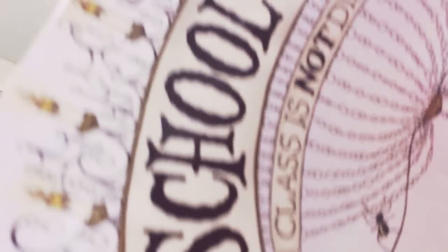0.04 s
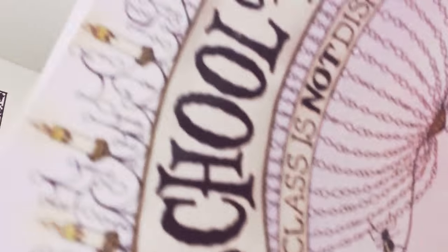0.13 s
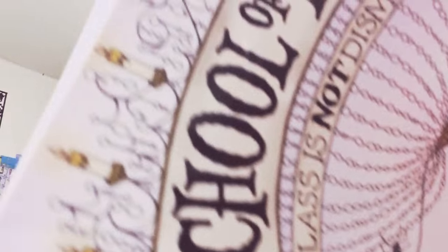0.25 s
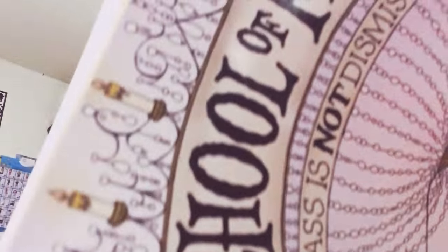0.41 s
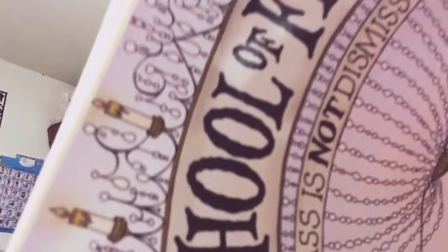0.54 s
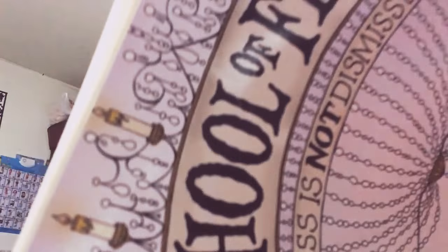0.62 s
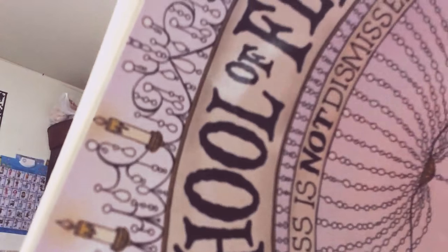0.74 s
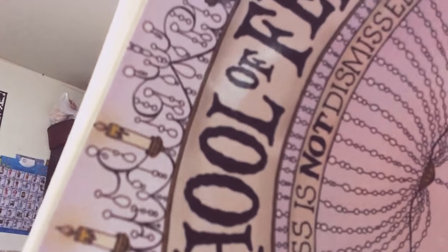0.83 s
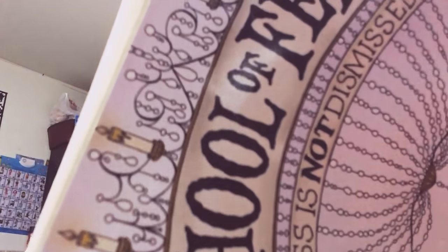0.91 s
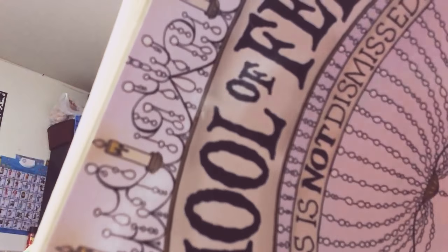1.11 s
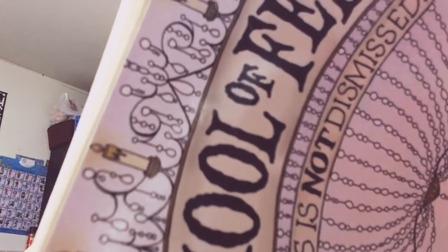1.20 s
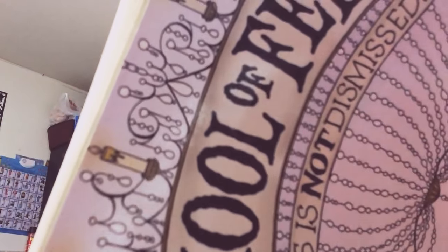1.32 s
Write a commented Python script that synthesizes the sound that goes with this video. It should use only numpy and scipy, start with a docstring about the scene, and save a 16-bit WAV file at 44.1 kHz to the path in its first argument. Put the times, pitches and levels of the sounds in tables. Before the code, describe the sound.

A book is handled close to the microphone in a small quiet room. At about 0.2 seconds comes the loudest moment, a quick cluster of sharp paper snaps, scraping and dull cover bumps, easing by 0.5. After a lull with very faint finger squeaks, another snap at 0.7 starts lighter rustling strokes, ticks and soft knocks until about 1.1. A faint bump follows near 1.3 over a low hush.

```python
"""A small quiet room, in which a book is shifted in the hands close by.
Bumps excite the damped modes of the cover, each over a dull thud, and its edges catch and snap free.
Paper and fingers slide over it in short strokes, grainy with the many tiny slips of friction.
Faint thin squeaks fill the pauses, above a low hush. The walls add a short dull reverberation."""
import sys
import numpy as np
from scipy import signal
from scipy.fft import rfft, irfft, next_fast_len
from scipy.io import wavfile
from scipy.ndimage import map_coordinates

SR = 44100
rng = np.random.default_rng(int(sys.argv[2]) if len(sys.argv) > 2 else 0)


def put_to_file(sound):
    """Save the sound as 16-bit audio at rate SR, in the file named by the first command-line argument."""
    columns = np.atleast_2d(sound).T  # one column per channel
    safe = np.clip(columns, -1, 1)
    whole_steps = np.round(safe * 32767)
    wavfile.write(sys.argv[1], SR, whole_steps.astype(np.int16))


N = 59535

# spectrum of the room's hush (frequency [Hz], relative density [dB])
HUSH_SPECTRUM = [(25, -9), (60, 1), (260, 0), (700, -5.5), (1200, -12), (3400, -14), (6000, -17.5),
                 (15500, -30)]
# reverberation time of the room (frequency [Hz], t60 [s])
REVERB_T60 = [(100, 0.31), (450, 0.37), (650, 0.34), (900, 0.2), (4000, 0.24), (12000, 0.27)]
# initial spectrum of the reverberation (frequency [Hz], relative level [dB])
REVERB_SPECTRUM = [(80, -1.5), (300, -1.5), (480, 1), (650, 1.5), (1000, -0.5), (4000, -2.5), (12000, 0.5)]
# fingertip squeaks (start [s], length [s], level [dB], centre [Hz], spread [octaves])
FINGER_SQUEAKS = [(0.013, 0.053, -83, 3440, 0.015), (0.088, 0.088, -79, 3460, 0.017),
                  (0.497, 0.086, -73.5, 5070, 0.17), (0.566, 0.083, -78, 5660, .03),
                  (0.644, 0.068, -67.5, 5120, .085)]
# sliding strokes (start [s], attack [s], hold [s], release t60 [s], level [dB], tilt [dB/octave])
SLIDING_STROKES = [(0.211, 0.017, 0.031, 0.83, -52.5, -1.5), (0.24, 0.016, 0.058, 0.1367, -37, -1),
                   (0.333, 0.0071, 0.0036, 0.3532, -42.5, 0), (0.379, 0.0033, 0.0036, 0.29, -55.5, -2.5),
                   (0.43, 0.0084, 0.03, 0.08, -50, -3), (0.708, 0.0054, .012, 1.2, -54.5, -3.5),
                   (0.724, 0.013, 0.0074, 0.02, -47, 0), (0.766, 0.0089, 0.015, .1, -69, -5.5),
                   (0.808, 0.0063, 0.012, 0.06, -52, 2.5), (0.841, 0.0087, 0.01, 0.22, -53, -1.5),
                   (0.904, 0.01, 0.028, 0.01, -54.5, 1), (.938, 0.0032, 0.031, 0.18, -50, 0),
                   (.974, 0.014, 0.0075, 0.24, -45, 1), (1.011, 0.011, .004, 0.47, -60.5, -4),
                   (1.06, 0.0092, 0.0027, 0.2756, -53.5, 0)]
# spectrum of sliding friction (frequency [Hz], relative density [dB])
FRICTION_SPECTRUM = [(60, -8), (200, -1), (480, -4), (720, 2), (1100, -3.5), (2000, 0), (3100, -4.5),
                     (4300, -2.5), (6500, -8), (8500, -13), (11000, -22.5), (15500, -40.5)]
# narrow treble resonances of the cover (frequency [Hz], width [Hz], boost [dB])
COVER_RESONANCES = [(2265, 90, -0.5), (2730, 110, 6.5), (2930, 120, 4), (3200, 80, 9.5), (3335, 60, 5.5),
                    (3590, 35, 0.5), (3820, 20, 1)]
# snaps of paper and cover edges (time [s], level [dB], centre [Hz], spread [octaves], t60 [s])
EDGE_SNAPS = [(0.1647, -57.5, 1440, 1.46, 0.078), (0.2117, -42, 6740, 0.22, 0.011),
              (0.2118, -46.5, 2420, 1.6, 0.018), (0.2423, -36.5, 5530, 0.62, 0.041),
              (0.2424, -28.5, 1730, 0.82, 0.014), (.2679, -20, 3260, 0.69, 0.031),
              (0.2709, -25.5, 2980, 0.62, .03), (.3052, -39, 12500, .4, .009),
              (0.3115, -25.5, 2910, 0.79, 0.026), (.342, -39, 3930, 0.95, 0.044),
              (.394, -42, 4940, 0.24, 0.042), (0.4365, -38.5, 3060, 1.55, 0.019),
              (.463, -41, 2700, 0.62, 0.019), (0.7135, -39.5, 5000, 0.45, 0.013),
              (0.7133, -46.5, 2000, 1.5, 0.024), (.7386, -27.5, 4200, 1.32, .011),
              (0.8118, -47.5, 4850, 0.27, .04), (.865, -48, 7050, 0.65, 0.018), (0.9083, -37, 3000, 1, .02),
              (0.938, -39.5, 2980, 1.16, 0.013), (.957, -48, 7340, 0.27, 0.086),
              (.982, -44.5, 1880, 0.82, 0.076), (0.999, -44, 7340, 0.17, .035),
              (1.084, -44.5, 4500, 1.3, 0.027), (1.2962, -53, 1147, 0.28, 0.017),
              (1.2965, -54.5, 428, .5, 0.028)]
# colour common to all snaps (frequency [Hz], relative level [dB])
SNAP_SPECTRUM = [(100, -9), (1000, 5), (7000, 0), (10000, -4.5), (15000, -20.5)]
# modes of the cover (frequency [Hz], relative level [dB], free t60 [s])
COVER_MODES = [(70, -6.5, .09), (97.5, 2, 0.16), (136.6, -4, .09), (211.6, 0.5, 0.081), (285, -1, 0.12),
               (331, -2, 0.067), (427, 1, .09), (586.4, -4, 0.09), (646.8, -2, .13), (702.4, 3.5, 0.084),
               (814, -3, 0.084), (885, -12, 0.03)]
# bumps on the cover (time [s], level [dB], centre [Hz], spread [octaves], damping [ratio, 1 = free])
COVER_BUMPS = [(.166, -53, 605, 0.8, 1.5), (0.173, -45.5, 149, 0.31, 1.5), (0.177, -52, 335, 0.2, 1.1),
               (.2430, -21, 697, 0.34, 1.13), (.245, -30.5, 193, 0.93, 1.56), (.260, -28, 660, 0.19, 1.2),
               (0.2856, -28.5, 304, 1, 1.3), (.311, -36, 400, 1.46, 0.86), (.318, -45.5, 75, 0.53, 0.93),
               (.345, -40, 296, 1.3, 1), (.416, -42.5, 292, 0.92, 1.14), (.4356, -30, 228, 0.95, 1.8),
               (.4365, -37, 726, 0.36, 1.7), (0.451, -42.5, 390, 1.2, 1.8), (.486, -40, 140.3, 0.69, 0.9),
               (.496, -46, 202, 0.75, 1.5), (.532, -47, 150, .6, .7), (0.713, -48, 110, 1.26, 1.3),
               (.727, -41, 430, 0.69, 1.8), (.752, -57, 95, .4, 1.1), (0.815, -47, 104, 1, 1.8),
               (.830, -47, 103, .22, 1.2), (.858, -45, 740, 0.28, 1.37), (.950, -43, 798, 0.19, 1.2),
               (1.014, -49.5, 120, 0.9, 1.4), (1.0631, -42.5, 280, 1.06, 0.83),
               (1.066, -54, 620, .13, 0.21), (1.069, -43, 160.3, 0.47, 1.26), (1.11, -50, 100, 1, 0.93),
               (1.275, -55.5, 130, 1.8, 1.1), (1.277, -64, 630, .15, 0.79)]


def amp(db):
    """Amplitude ratio of a level in decibels."""
    return 10 ** (np.asarray(db) / 20)


def unit(x):
    """The signal normalised to rms 1."""
    return x / np.sqrt(np.mean(x ** 2) + 1e-20)


def along(points, hz):
    """Interpolation of (frequency [Hz], value) points on a logarithmic frequency axis."""
    f, v = np.transpose(points)
    return np.interp(np.log(hz + 1), np.log(f + 1), v)


def hump(hz, centre, octaves):
    """A resonance-like peak, symmetric in log frequency."""
    return (1 + (np.log2((hz + 1) / centre) / octaves / 2) ** 2) ** -4


def filtered(x, response):
    """Linear filtering: the spectrum is multiplied by a frequency response."""
    size = next_fast_len(len(x) + 2048, True)
    return irfft(rfft(x, size) * response(np.fft.rfftfreq(size, 1 / SR)), size)[:len(x)]


def noise(response, size):
    """White noise coloured by a frequency response, at rms 1."""
    return unit(filtered(rng.standard_normal(size), response))


def fade(t, t60):
    """Exponential decay by 60 dB in t60 seconds, starting at t = 0."""
    return np.exp(-np.log(1000) * np.maximum(t, 0) / t60)


def burst(response, attack, t60):
    """A transient of coloured noise that rises quickly and decays exponentially."""
    t = np.arange(SR // 10) / SR
    envelope = (1 - np.exp(-t / attack)) * fade(t, t60)
    return unit(envelope * noise(response, len(t))) * np.sqrt(np.mean(envelope ** 2))


def contact_time():
    """Time axis of one contact, in seconds."""
    return np.arange(int(.4 * SR)) / SR


def add(out, start, x):
    """Superposition: x is added to out from start seconds on."""
    part = out[max(round(start * SR), 0):][:len(x)]
    part += x[:len(part)]


def hush():
    """Stationary background noise, strongest in the bass."""
    return amp(-72.5) * noise(lambda f: amp(along(HUSH_SPECTRUM, f)), N)


def reverberation(x, wall_delay_s=.004):
    """Diffuse reflections from the walls decay exponentially, each frequency at its own rate."""
    hz, t, spectrum = signal.stft(rng.standard_normal(SR // 2), SR, nperseg=256)
    decay_db = 60 * t / along(REVERB_T60, hz)[:, None]
    gain = amp(along(REVERB_SPECTRUM, hz)[:, None] - decay_db)
    tail = signal.istft(spectrum * gain, SR, nperseg=256)[1]
    impulse_response = np.pad(tail / np.linalg.norm(tail), (int(wall_delay_s * SR), 0))
    return signal.fftconvolve(x, impulse_response)[:N]


def squeaks(ramp_s=.007):
    """Narrow-band noise has a thin pitch, like a fingertip creeping on the smooth cover."""
    out, t = np.zeros(N), contact_time()
    for start, length, level, centre, spread in FINGER_SQUEAKS:
        envelope = np.clip(np.minimum(t, length - t) / ramp_s, 0, 1)
        add(out, start, amp(level) * envelope * noise(lambda f: hump(f, centre, spread), len(t)))
    return out


def cover_boost_db(hz):
    """Treble resonance of the cover: each mode adds a narrow Lorentzian curve to the response in dB."""
    return sum(db / (1 + (2 * (hz - centre) / width) ** 2) for centre, width, db in COVER_RESONANCES)


def sliding(slips_per_s=2500, slip_spread_db=2.5, hiss_db=-1, judder_db=1.5, judder_per_s=140):
    """Stick-slip friction: dense tiny impulses and hiss judder, coloured by the cover and its treble
    resonances."""
    out, t = np.zeros(N), contact_time()
    n = len(t)
    for start, attack, hold, release, level, tilt in SLIDING_STROKES:
        slips = (rng.random(n) < slips_per_s / SR) * rng.choice([-1, 1], n)
        strength = amp(slip_spread_db * np.minimum(rng.exponential(size=n), 4))
        grit = unit(slips * strength) + amp(hiss_db) * rng.standard_normal(n)
        judder = map_coordinates(rng.standard_normal(512), [t * judder_per_s])  # smooth random curve
        colour = lambda f: amp(along(FRICTION_SPECTRUM, f) + cover_boost_db(f) + tilt * np.log2(f + 1))
        friction = filtered(grit * amp(judder_db * judder), colour)
        envelope = np.minimum(t / attack, 1) * fade(t - attack - hold, release)
        add(out, start, amp(level) * envelope * unit(friction))
    return out + amp(-12) * reverberation(out)


def snaps(attack_s=.0004):
    """Sudden release: an edge catches and lets go, radiating a sharp, heavily damped transient."""
    out = np.zeros(N)
    for start, level, centre, spread, t60 in EDGE_SNAPS:
        colour = lambda f: hump(f, centre, spread) * amp(along(SNAP_SPECTRUM, f))
        add(out, start, amp(level) * burst(colour, attack_s, t60))
    return out + amp(-8) * reverberation(out)


def bumps(attack_s=.0007, thud_db=-7.5, thud_t60_s=.04):
    """Impact excites the cover's modes in a band, over a dead thud; the grip sets their damping."""
    out, t = np.zeros(N), contact_time()
    hz, mode_db, free_t60 = np.transpose(COVER_MODES)[:, :, None]
    modes = np.sin(2 * np.pi * hz * t) * (1 - np.exp(-t / attack_s))
    for start, level, centre, spread, damping in COVER_BUMPS:
        excitation = lambda f: hump(f, centre, spread)
        weights = amp(mode_db + rng.normal(0, 1, hz.shape)) * excitation(hz)
        weights *= rng.choice([-1, 1], hz.shape) / np.linalg.norm(weights)
        ring = np.sum(weights * modes * fade(t, free_t60 / damping), axis=0)
        add(out, start, amp(level) * ring)
        add(out, start, amp(level + thud_db) * burst(excitation, attack_s, thud_t60_s))
    return out + amp(-9) * reverberation(out)


def scene():
    """Sound pressures add: the handled book over the room's hush, in one channel."""
    return (hush() + bumps() + snaps() + sliding() + squeaks())[None]


def record(dry):
    """Band limiting: a high-pass filter sheds the deepest bass, and a sharp cut ends the treble."""
    low_cut_hz, top_hz = 57, 15800
    highpass = signal.butter(3, low_cut_hz, 'highpass', fs=SR, output='sos')
    return filtered(signal.sosfilt(highpass, dry[0]), lambda hz: hz < top_hz)[None]


dry = scene()
out = record(dry)
put_to_file(out)
```